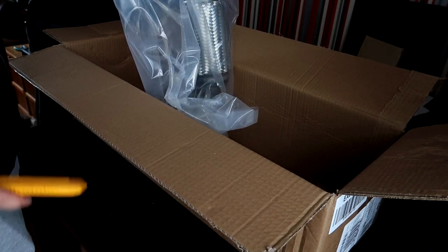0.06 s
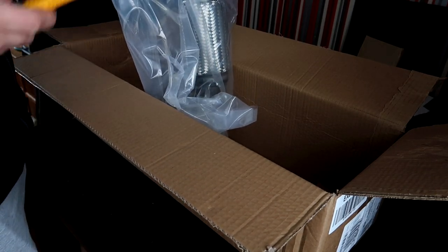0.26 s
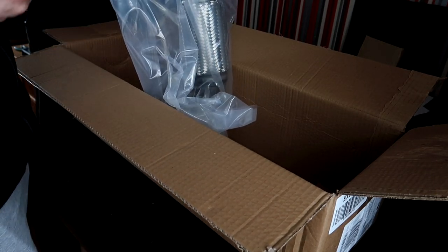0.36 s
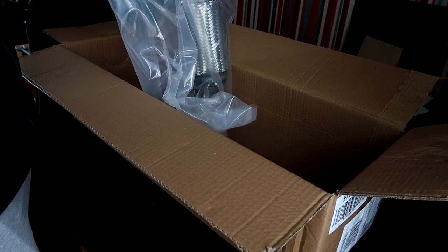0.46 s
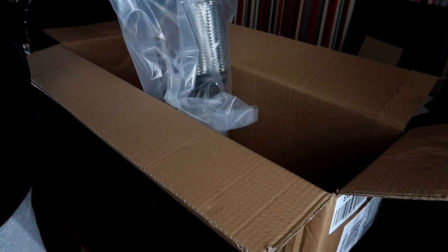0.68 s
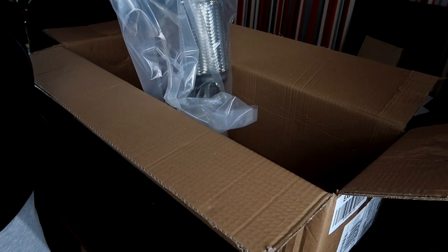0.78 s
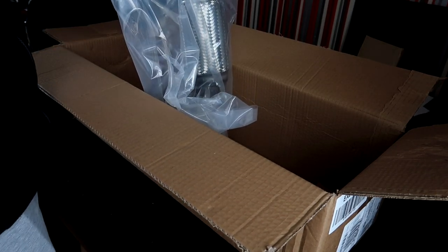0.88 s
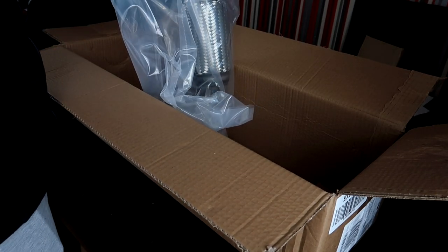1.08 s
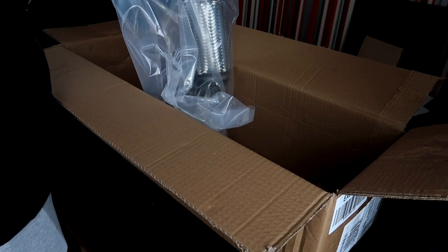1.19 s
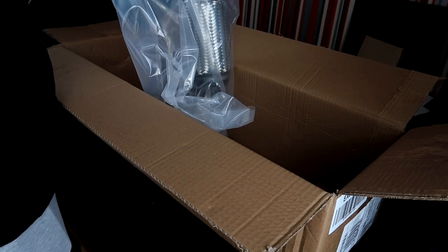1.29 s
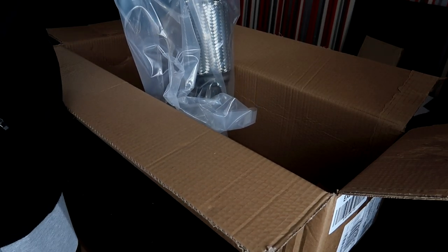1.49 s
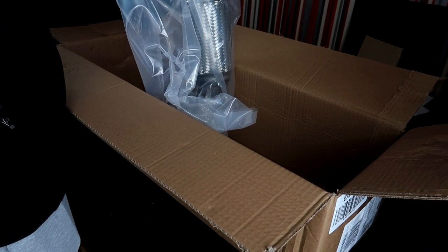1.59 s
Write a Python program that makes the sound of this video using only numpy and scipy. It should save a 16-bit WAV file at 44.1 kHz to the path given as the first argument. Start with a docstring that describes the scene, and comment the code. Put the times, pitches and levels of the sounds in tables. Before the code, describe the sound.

Close up in a small, quiet room, a utility knife is handled: light clicks and a hollow cardboard bump, a quick ratchet of the slider, then louder knocks and a brief scrape as it is set down among hard parts.

```python
"""Over faint room noise, hard parts shift and click beside an open cardboard box, which gives a
hollow bump at 0.2 s. From 0.35 s the slider of a utility knife ratchets over five notches, each
ringing the handle. From 0.7 s the knife and other parts are put down and shifted: knocks, softer
bumps and a short scrape, with the air in the box humming along. A tiny tick follows at 1.5 s,
and a low rumble swells at the end. The room is small and quiet."""
import sys
import numpy as np
from scipy import signal
from scipy.fft import rfft, irfft, next_fast_len
from scipy.io import wavfile

SR = 44100
rng = np.random.default_rng(int(sys.argv[2]) if len(sys.argv) > 2 else 0)


def dump_mix(stems):
    """Bounce the given channels to the path in sys.argv[1] as a 16-bit WAV at rate SR."""
    frames = np.atleast_2d(stems).T  # one column per channel
    limited = np.clip(frames, -1, 1)  # hard clip at full scale
    pcm = np.round(limited * 32767).astype(np.int16)
    wavfile.write(sys.argv[1], SR, pcm)


N = 72765
T = np.arange(SR // 3) / SR  # time axis of one event [s]
TOP_HZ = 16500


def amp(db):
    """Decibels to gain."""
    return 10 ** (np.asarray(db) / 20)


def unit(x):
    """Scale to rms 1."""
    return x / np.sqrt(np.mean(x ** 2) + 1e-20)


def along(points, hz):
    """(frequency, value) points read on a log axis."""
    freqs, values = np.transpose(points)
    return np.interp(np.log(hz + 1), np.log(freqs + 1), values)


def envelope(points):
    """(time, level) points as a gain per sample."""
    return amp(np.interp(np.arange(N) / SR, *np.transpose(points)))


def filtered(x, response):
    """Apply a complex frequency response."""
    n = x.shape[-1]
    padded = next_fast_len(n + SR // 8)
    return irfft(rfft(x, padded) * response(np.fft.rfftfreq(padded, 1 / SR)), padded)[..., :n]


def delayed(x, delay_s):
    """Delay a short sound."""
    return filtered(x, lambda hz: np.exp(-2j * np.pi * hz * delay_s))


def noise(spectrum, size):
    """Coloured noise of rms 1."""
    return unit(filtered(rng.standard_normal(size), lambda hz: amp(along(spectrum, hz))))


def pulse(spectrum):
    """Minimum-phase click of peak 1 with the given spectrum."""
    n = len(T)
    cepstrum = irfft(np.log(amp(along(spectrum, np.fft.rfftfreq(n, 1 / SR)))), n)
    cepstrum[1:n // 2] *= 2
    cepstrum[n // 2 + 1:] = 0
    click = irfft(np.exp(rfft(cepstrum)), n)
    return click / np.abs(click).max()


def fade(t60_s):
    """Decay by 60 dB in t60_s."""
    return np.exp(-np.log(1000) * T / t60_s)


def ring(hz, t60_s):
    """One damped mode."""
    return np.sin(2 * np.pi * hz * T) * fade(t60_s)


def smeared(x, t60_s):
    """Convolve with a decaying noise burst of unit energy."""
    burst = unit(rng.standard_normal(len(T)) * fade(t60_s)) / np.sqrt(len(T))
    return signal.fftconvolve(x, burst)[:len(T)]


def add(out, time_s, x):
    """Mix x into out at time_s."""
    part = out[:, round(time_s * SR):][:, :x.shape[-1]]
    part += x[..., :part.shape[1]]


# diffuse sound (frequency [Hz], left-right correlation [-1..1])
COHERENCE = [(100, .995), (500, 1), (1000, 0.95), (2000, 0.91), (4000, 0.62), (8000, -0.25), (14000, -0.28)]
def widen(pair, coherence=COHERENCE):
    """Two unrelated signals become a diffuse left and right."""
    angle = lambda hz: np.arccos(np.clip(along(coherence, hz), -1, 1)) / 2
    mid, side = filtered(pair, lambda hz: np.array([np.cos(angle(hz)), np.sin(angle(hz))]))
    return np.array([mid + side, mid - side])


# side signal between the microphone ports (frequency [Hz], gain [dB])
PORT_SIDE = [(300, -49), (1000, -17), (2000, -24), (4000, -14), (8000, -6), (14000, 1)]
def ports(x, lag_s):
    """Direct sound reaches the two ports with a small lag and a slightly different treble."""
    side = filtered(smeared(x, t60_s=0.0021), lambda hz: amp(along(PORT_SIDE, hz)))
    sign = np.array([[1], [-1]])
    return filtered(x, lambda hz: np.exp(1j * np.pi * hz * lag_s * sign)) + sign * side


# room decay (frequency [Hz], t60 [s])
ROOM_DECAY = [(150, 0.3), (500, 0.3), (2000, 0.31), (5000, 0.3), (12000, 0.2)]
# echoes off nearby surfaces (delay [s], gain [dB])
ECHOES = [(.0039, -21), (.0053, -10), (.0064, -32)]
def in_room(x, room_db, lag_s=0.00001):
    """Direct sound, echoes and scatter from nearby surfaces, then the room's tail."""
    hz, t, bands = signal.stft(rng.standard_normal((2, len(T))), SR, nperseg=256)
    decay = np.exp(-np.log(1000) * t / along(ROOM_DECAY, hz)[:, None])
    far = signal.istft(bands * decay, SR)[1][:, :len(T)]
    near = rng.standard_normal((2, len(T))) * fade(t60_s=0.048)
    rise = 1 - np.exp(-T / 0.001)
    tail = widen(unit(near * rise) + amp(-3.5) * unit(far * rise)) / np.sqrt(len(T))
    reverb = signal.fftconvolve(delayed(x, delay_s=0.002)[None], tail, axes=1)[:, :len(T)]
    echoes = sum(amp(db) * delayed(x, delay_s) for delay_s, db in ECHOES)
    return ports(x, lag_s) + amp(room_db) * (reverb + echoes)


# room noise spectra (frequency [Hz], level [dB])
HISS_SPECTRUM = [(12, -5), (20, -6), (138, 5), (262, -1.5), (422, -4.5), (780, -15), (949, -16),
                 (1480, -12.5), (2140, -14), (2600, -22), (3160, -18), (7310, -25), (11800, -28),
                 (12800, -26), (16000, -83)]
RUMBLE_SPECTRUM = [(40, -33), (80, -12), (105, 7), (135, 1.5), (200, -6), (400, -27), (1000, -83)]
THROB_SPECTRUM = [(15, -25), (32, 12), (38, 10), (55, -37), (200, -83)]
# hiss width (frequency [Hz], left-right correlation [-1..1])
HISS_COHERENCE = [(100, 1), (400, 0.54), (1000, 0.2), (2000, 0.16), (4000, 0.12), (10000, 0)]
# low swells (time [s], level [dB])
RUMBLE_ENVELOPE = [(0, -61.5), (.5, -67.5), (.62, -51.5), (.85, -54.5), (1.0, -48.5), (1.25, -53),
                   (1.4, -52.5), (1.58, -57), (1.64, -42)]
THROB_ENVELOPE = [(0, -80), (.15, -57), (.25, -60), (.5, -57), (.7, -57), (1.55, -71), (1.64, -41)]
HISS_DB = -53
def room_noise():
    """Faint steady hiss, with a low rumble and a deep throb that swell and ebb."""
    hiss = amp(HISS_DB) * unit(widen(noise(HISS_SPECTRUM, (2, N)), HISS_COHERENCE))
    rumble = envelope(RUMBLE_ENVELOPE) * noise(RUMBLE_SPECTRUM, N)
    throb = envelope(THROB_ENVELOPE) * noise(THROB_SPECTRUM, N)
    return hiss + rumble + throb


# sliding of the parts (time [s], level [dB])
SCRAPE_ENVELOPE = [(0, -44.5), (.04, -54.5), (.10, -65), (.18, -51.5), (.25, -54), (.56, -55.5), (.60, -50),
                   (.66, -54), (.87, -50), (.905, -38.5), (.93, -45.5), (.96, -34.5), (1.02, -38.5),
                   (1.09, -41), (1.126, -38.5), (1.177, -41.5), (1.195, -48), (1.29, -61), (1.65, -61)]
# sliding friction (frequency [Hz], level [dB])
SCRAPE_SPECTRUM = [(80, -12), (200, -3.5), (400, -2), (700, -5), (1300, -1), (2000, -4.5), (3200, -15),
                   (5000, -15.5), (8000, -20.5), (12000, -27.5), (16000, -92)]
SLIPS_PER_S, SLIP_SPREAD_DB = 1200, 3
def scrape():
    """Sliding parts catch in many small slips over a smooth rub."""
    slips = (rng.random(N) < SLIPS_PER_S / SR) * rng.standard_normal((2, N))
    slips *= amp(SLIP_SPREAD_DB * (0.5 - rng.random(N)))
    friction = unit(slips) + rng.standard_normal((2, N))
    coloured = signal.fftconvolve(friction, pulse(SCRAPE_SPECTRUM)[None], axes=1)[:, :N]
    return envelope(SCRAPE_ENVELOPE) * unit(widen(coloured))


AIR_HZ, AIR_WIDTH_HZ, AIR_DB = 391.4, 7.6, 3
def box_air(x):
    """The air in the open box resonates with nearby sounds."""
    resonance = lambda hz: 1j * hz * AIR_WIDTH_HZ / (AIR_HZ ** 2 - hz ** 2 + 1j * hz * AIR_WIDTH_HZ)
    return amp(AIR_DB) * filtered(x.mean(axis=0), resonance)


# rubbing on the box (time [s], level [dB])
BOX_RUB_ENVELOPE = [(0, -69), (.08, -61), (.14, -56), (.2, -58), (.45, -72), (.56, -72), (.61, -49),
                    (.68, -56), (.74, -51.5), (.83, -63), (.9, -57), (1.3, -72)]
# hollow note of the rubbed box (frequency [Hz], level [dB])
BOX_RUB_SPECTRUM = [(200, -33), (340, -13), (378, -3.5), (402, -1.5), (440, -22), (700, -38), (1500, -80)]
def box_rub():
    """Light rubbing sounds the hollow note of the box."""
    return envelope(BOX_RUB_ENVELOPE) * noise(BOX_RUB_SPECTRUM, N)


# hard contacts (time [s], level [dB], ring [Hz], ring t60 [s], upper ring [Hz], upper ring [dB],
# thud trim [dB], snap trim [dB], cut-off [Hz], room send [dB])
CONTACTS = [(0.1141, -32, 1330, 0.011, 2730, -26, -5, -4, 8850, -5),
            (0.1659, -24.5, 1770, 0.0044, 2860, -29, -11, -8.5, 5800, -4.5),
            (0.2225, -37.5, 1590, 0.019, 1780, -17, -22, 4.5, 8900, -6),
            (0.2750, -36.5, 1580, 0.0056, 2340, 2, -22, -1, 5000, 3),
            (0.2844, -22, 1590, 0.0097, 2310, -3.5, -3.5, -12, 4700, -0.5),
            (0.6826, -33, 1510, 0.009, 3370, -22, -1.5, -22, 6640, 1.5),
            (0.7203, -33, 1510, 0.015, 2500, -26, 0, -32, 3970, 0),
            (0.7654, -12, 2080, 0.0068, 5700, -0.5, -16, -3, 15400, -6),
            (0.7694, -16, 1500, 0.0042, 2170, -4, -15.5, -17, 7040, 3.5),
            (0.7991, -15, 2060, 0.0073, 2630, -10, -17, -6, 6640, -6.5),
            (0.8846, -25.5, 2200, 0.0032, 3100, -17, -19, -16, 5500, -15),
            (0.8920, -23, 1680, 0.0041, 2480, 5, -5, -30, 4000, 0.5),
            (0.9749, -13.5, 2760, 0.011, 3100, 0.5, -8, -8.5, 4900, -9.5),
            (1.0062, -20.5, 1420, .004, 7200, -7, -9, -8, 9000, 3),
            (1.0128, -31, 1400, 0.0065, 2520, -2, -16, -10, 6000, -13),
            (1.0392, -13, 1180, 0.012, 4240, -11, -3.5, -5.5, 8900, -4),
            (1.0446, -22.5, 1302, 0.048, 1465, -2, -24, -3, 6000, -2.5),
            (1.1135, -18.5, 2750, 0.01, 3680, -11, -12, -3.5, 11400, -6.5),
            (1.1159, -19, 1350, 0.011, 1640, -11, -6, -24, 4000, -3),
            (1.1330, -23, 1600, 0.0022, 4000, 8, -0.5, -17, 6000, 4),
            (1.1470, -24.5, 1330, 0.0064, 2100, 3, -7, -4, 6000, -2.5),
            (1.1699, -22.5, 1250, 0.018, 2280, -19, 0, -19, 4480, -3),
            (1.237, -26, 1020, 0.0098, 2300, -14, -42, -20, 3540, 0.5),
            (1.3322, -30.5, 1010, 0.0051, 2520, -25, -23, -17, 3250, 4.5),
            (1.4377, -21, 2180, 0.0052, 3560, -4, -6.5, -16, 7300, -1),
            (1.4437, -32, 2480, 0.021, 3690, -6, -22, 2.5, 11200, 3.5)]
# spectra shared by all contacts (frequency [Hz], level [dB])
CLACK_SPECTRUM = [(150, -16.5), (600, -2.5), (1200, 4.5), (2300, 5), (3600, 2), (5000, -18.5), (8000, -16),
                  (16000, -15.5)]
THUD_SPECTRUM = [(60, -27.5), (200, 5), (450, 7.5), (900, 13.5), (1800, -14.5), (8000, -72.5)]
SNAP_SPECTRUM = [(500, -21), (3000, -2.5), (5000, -1.5), (8000, -6), (11000, -9.5), (13000, -10),
                 (16000, -6)]
BODY_DB, THUD_DB, SNAP_DB = -0.5, -4, -2
def knocks():
    """Hard parts meet: a clack, two short rings, a low thud and a bright snap; soft hits are duller."""
    def mode(hz, t60_s):
        swing = ring(hz, t60_s) * (1 - fade(t60_s=0.003))
        return np.gradient(swing) * SR / (2 * np.pi * hz)

    out = np.zeros((2, N))
    clack, thud = pulse(CLACK_SPECTRUM), pulse(THUD_SPECTRUM)
    for time_s, db, hz, t60_s, upper_hz, upper_db, thud_db, snap_db, cutoff_hz, room_db in CONTACTS:
        chatter = smeared(clack, t60_s=0.006)  # a flurry of smaller contacts
        rings = mode(hz, t60_s) + amp(upper_db) * mode(upper_hz, t60_s)
        body = amp(BODY_DB) * (clack + chatter + rings)
        snap = noise(SNAP_SPECTRUM, len(T)) * fade(t60_s=0.0064) * (1 - fade(t60_s=0.00067))
        hit = body + amp(THUD_DB + thud_db) * thud + amp(SNAP_DB + snap_db) * snap
        low_pass = signal.butter(2, cutoff_hz, fs=SR, output='sos')
        add(out, time_s, amp(db) * in_room(signal.sosfilt(low_pass, hit), room_db))
    return out


# bumps on the box (time [s], level [dB])
BOX_BUMPS = [(0.2035, -21), (0.7208, -29), (0.797, -43.5), (0.974, -46), (1.0403, -30.5), (1.1170, -39)]
# box modes (frequency [Hz], level [dB], t60 [s])
BOX_MODES = [(178, -11, 0.071), (357, -4.5, 0.047), (385.6, -9, 0.18)]
BUMP_ATTACK_S = 0.0041
def box_bumps():
    """Soft bumps ring the hollow of the box."""
    out = np.zeros((2, N))
    hollow = sum(amp(db) * ring(hz, t60_s) for hz, db, t60_s in BOX_MODES)
    hollow *= 1 - np.exp(-T / BUMP_ATTACK_S)
    for time_s, db in BOX_BUMPS:
        add(out, time_s, amp(db) * in_room(hollow, room_db=-5.5))
    return out


# slider travel (time [s], level [dB])
TRACK_ENVELOPE = [(.335, -67), (.355, -44), (.40, -45.5), (.445, -43), (.50, -53), (.54, -45), (.58, -70),
                  (.62, -83)]
# track friction (frequency [Hz], level [dB])
TRACK_SPECTRUM = [(600, -8), (1600, -3), (4200, 0.5), (6000, -5), (11500, -12), (14000, -25)]
def slider_rub():
    """The plastic slider rubs along its dry track between notches."""
    return envelope(TRACK_ENVELOPE) * unit(widen(noise(TRACK_SPECTRUM, (2, N))))


# knife handle modes (frequency [Hz], level [dB], t60 [s])
HANDLE_MODES = [(1720, -11, 0.0066), (2427, -6.5, 0.018), (3396, -5, 0.018), (4170, 5, 0.0037),
                (5830, -22, 0.0028)]
MODE_SPREAD_DB, MODE_DETUNE = 2, 0.025
def handle_ring():
    """One strike rings the handle's modes in alternating polarity, a little differently each time."""
    out = np.zeros(len(T))
    for k, (hz, db, t60_s) in enumerate(HANDLE_MODES):
        gain = (-1) ** k * amp(db + rng.normal(0, MODE_SPREAD_DB))
        out += gain * ring(hz * (1 + rng.normal(0, MODE_DETUNE)), t60_s)
    return out


# slider notches (time [s], level trim [dB], cavity ring [Hz], cavity ring [dB],
# blade zing [Hz], blade zing [dB], rasp trim [dB])
SLIDER_NOTCHES = [(0.3530, -14.5, 1600, 5.5, 8900, -11, 3), (0.3834, -17.5, 1547, 13, 11100, -4, 2.5),
                  (0.4226, -12.5, 1555, 0, 4200, 10, -0.5), (0.4656, -17.5, 1800, 5, 4000, 19, 5.5),
                  (0.5197, -15.5, 1620, -7.5, 3980, 2, 2.5)]
# notch rasp (frequency [Hz], level [dB])
RASP_SPECTRUM = [(1000, -2), (2500, 4.5), (5000, -2.5), (8500, 3), (11500, 1), (14000, -12), (16000, -16)]
KNIFE_DB, RASP_DB, HAND_THUD_DB, LOW_CUT_HZ = -12.5, 3, -19, 1270
CATCH_RANGE_S = (0.000363, 0.001198)
def slider_notches():
    """Each notch rasps and rings handle, cavity and blade; the spring catches and strikes again."""
    out = np.zeros((2, N))
    low_cut = signal.butter(4, LOW_CUT_HZ, 'high', fs=SR, output='sos')
    thud = amp(HAND_THUD_DB) * pulse(THUD_SPECTRUM)
    attack = 1 - fade(t60_s=0.0037)
    for time_s, db, cavity_hz, cavity_db, zing_hz, zing_db, rasp_db in SLIDER_NOTCHES:
        strike = handle_ring()
        catch = amp(-2) * delayed(handle_ring(), rng.uniform(*CATCH_RANGE_S))
        cavity = amp(cavity_db) * ring(cavity_hz, t60_s=0.014)
        zing = amp(zing_db) * ring(zing_hz, t60_s=0.0035)
        rasp = amp(RASP_DB + rasp_db) * noise(RASP_SPECTRUM, len(T)) * fade(t60_s=0.015)
        click = signal.sosfilt(low_cut, (strike + catch + cavity + zing + rasp) * attack)
        add(out, time_s, amp(KNIFE_DB + db) * in_room(click + thud, room_db=-5, lag_s=0.00005))
    return 2 * out * amp([[0.5], [-0.5]])  # slightly left


# bright tick (frequency [Hz], level [dB])
TICK_SPECTRUM = [(1000, -5), (2400, -8), (2900, 1), (3600, -12), (8000, -17), (10000, -3), (12000, -13),
                 (14000, -11), (16000, -6.5)]
TICK_S, TICK_DB = 1.5236, -35
def tick():
    """One tiny, very bright tick close to the microphone."""
    out = np.zeros((2, N))
    burst = noise(TICK_SPECTRUM, len(T)) * fade(t60_s=0.012)
    add(out, TICK_S, amp(TICK_DB) * in_room(burst, room_db=-6.5))
    return out


def scene():
    """The handling sounds excite the air in the box; bumps, rubbing and room noise join them."""
    handling = slider_notches() + slider_rub() + knocks() + tick() + scrape()
    return handling + box_air(handling) + box_bumps() + box_rub() + room_noise()


# microphone response (frequency [Hz], gain [dB])
MIC_RESPONSE = [(11500, 0), (13500, -0.5), (16000, -19)]
def record(dry):
    """The microphone dulls the top octave and passes nothing above its band limit."""
    return filtered(dry, lambda hz: amp(along(MIC_RESPONSE, hz)) * (hz < TOP_HZ))


dry = scene()
out = record(dry)
dump_mix(out)
```